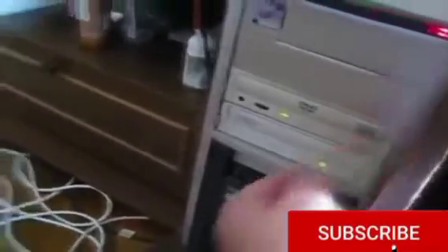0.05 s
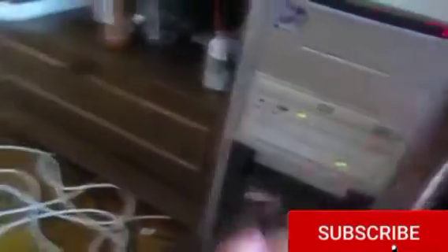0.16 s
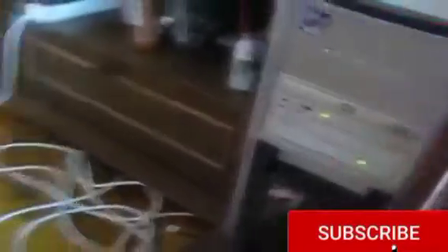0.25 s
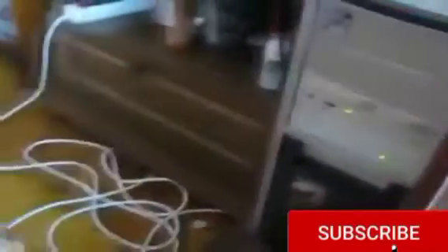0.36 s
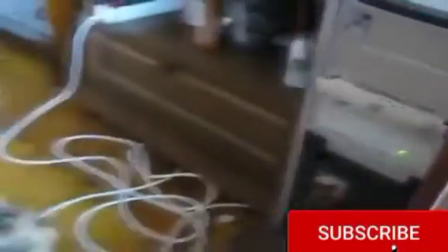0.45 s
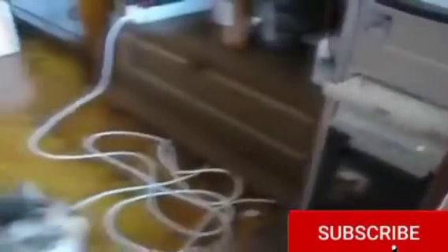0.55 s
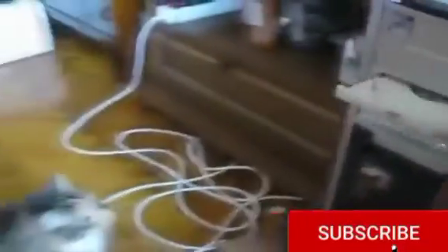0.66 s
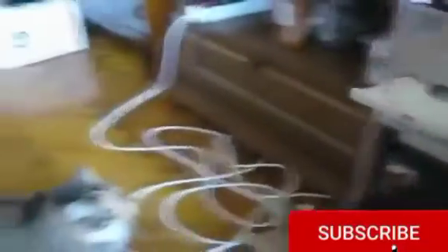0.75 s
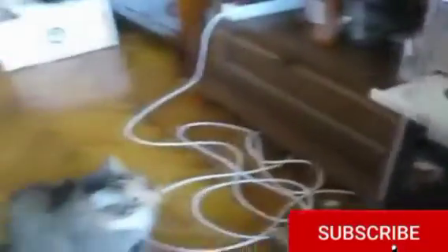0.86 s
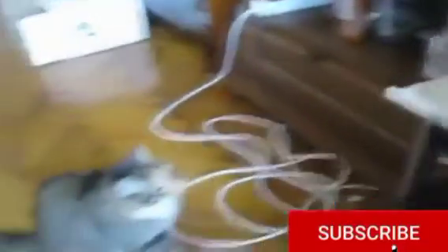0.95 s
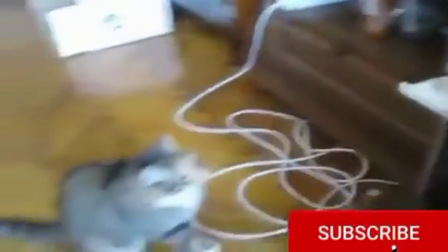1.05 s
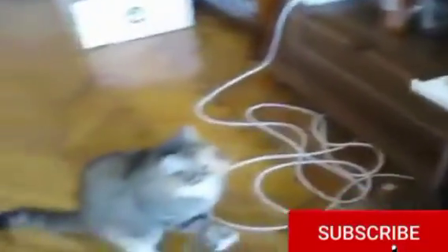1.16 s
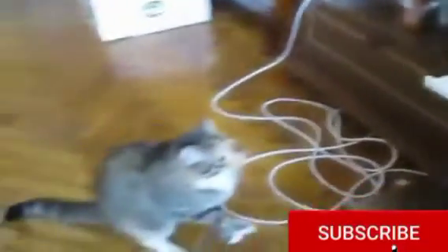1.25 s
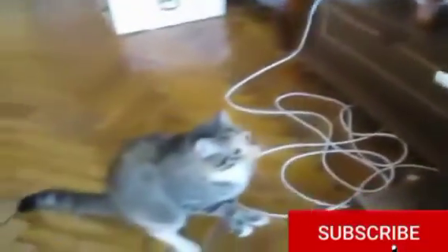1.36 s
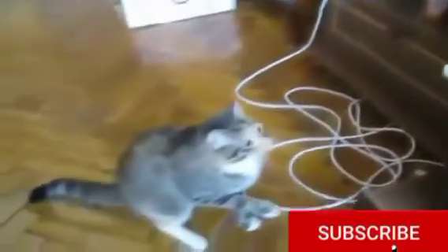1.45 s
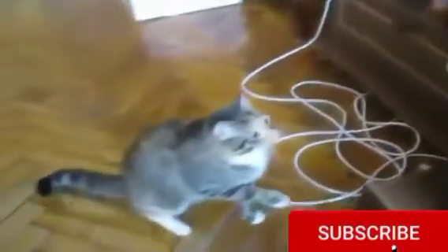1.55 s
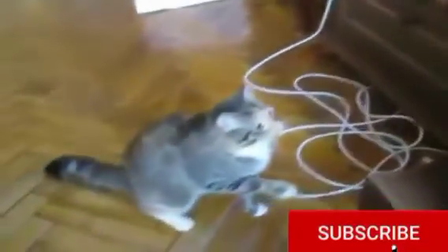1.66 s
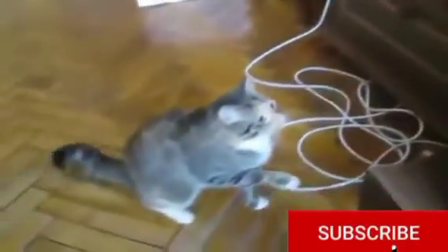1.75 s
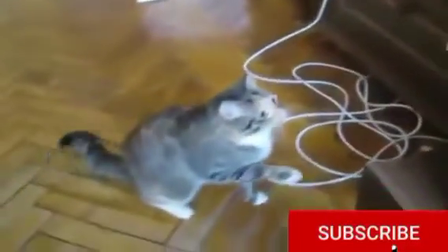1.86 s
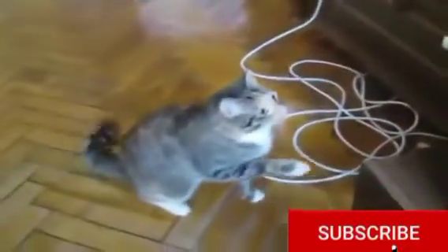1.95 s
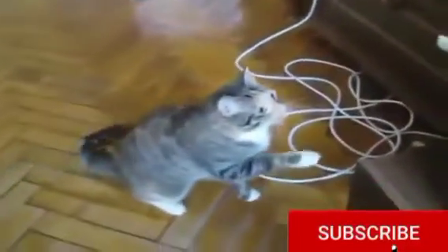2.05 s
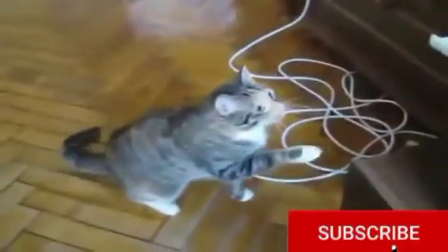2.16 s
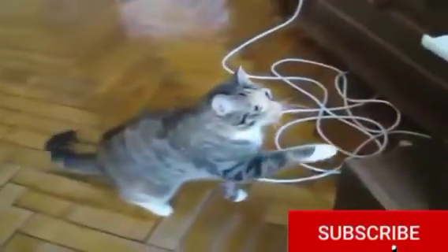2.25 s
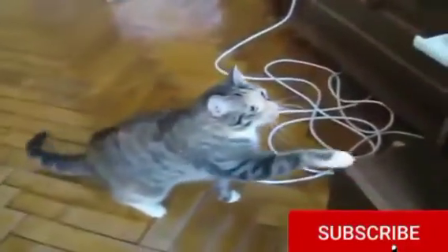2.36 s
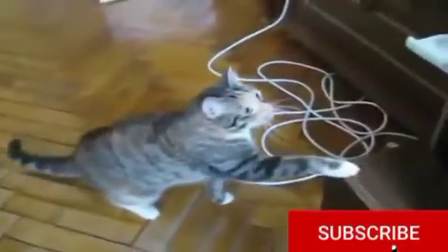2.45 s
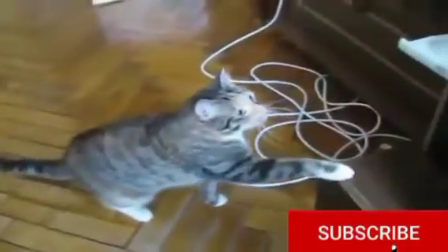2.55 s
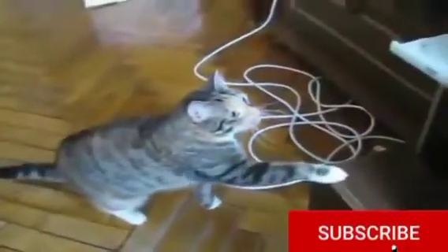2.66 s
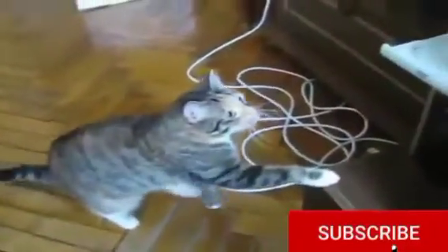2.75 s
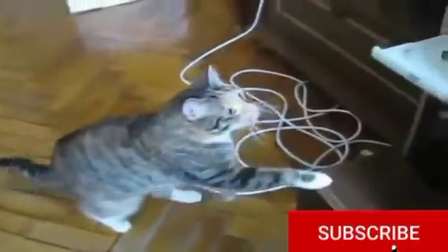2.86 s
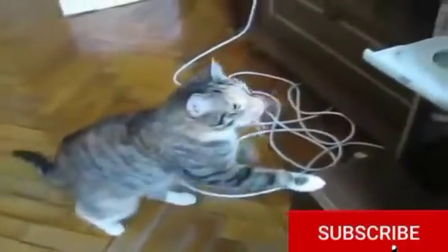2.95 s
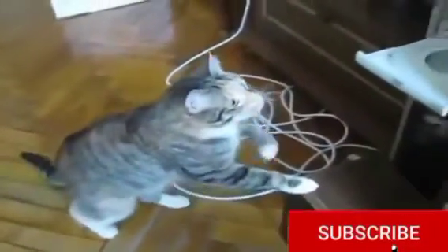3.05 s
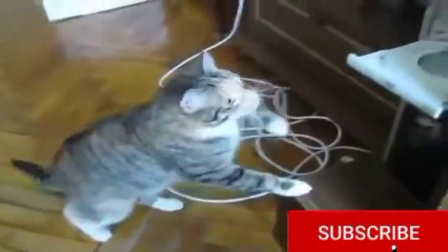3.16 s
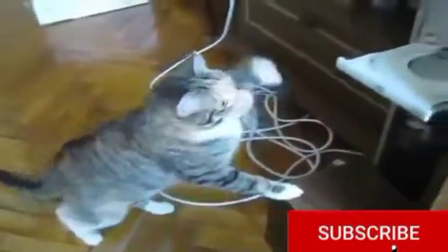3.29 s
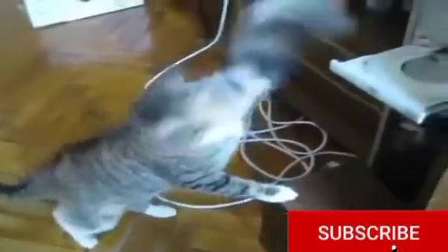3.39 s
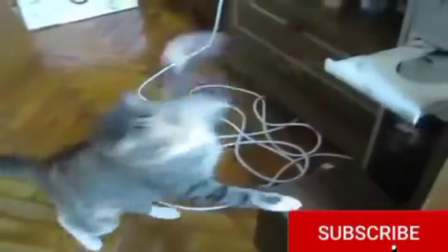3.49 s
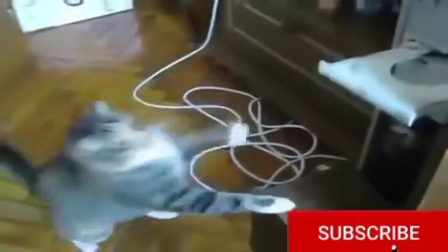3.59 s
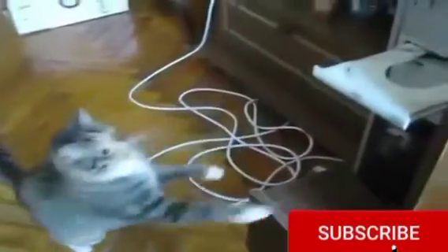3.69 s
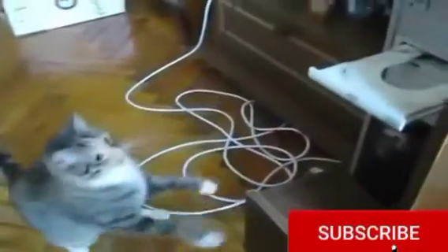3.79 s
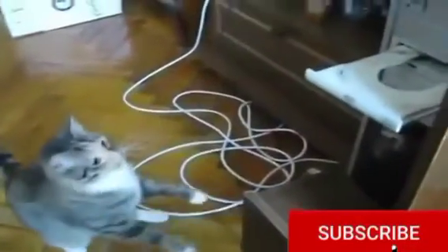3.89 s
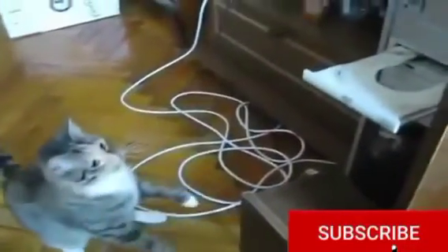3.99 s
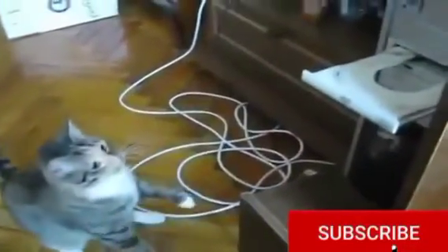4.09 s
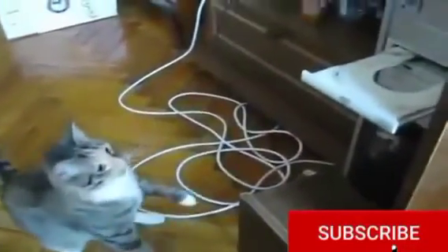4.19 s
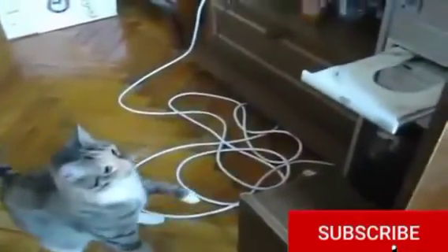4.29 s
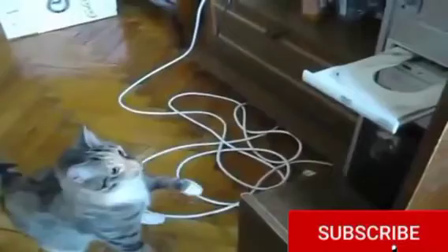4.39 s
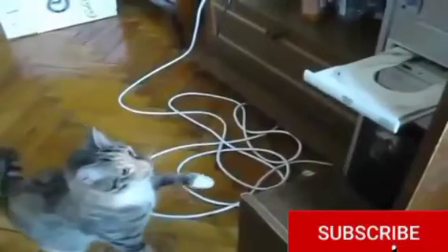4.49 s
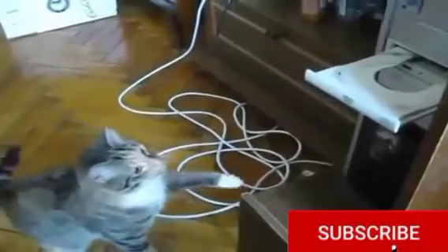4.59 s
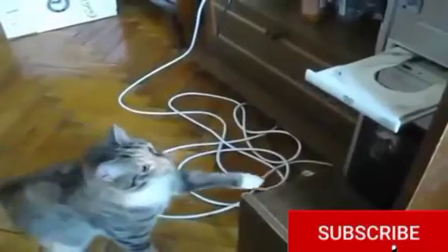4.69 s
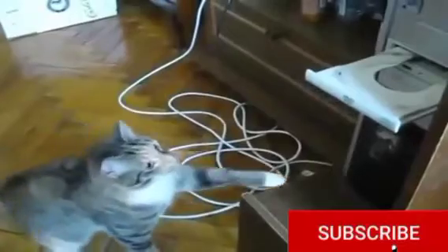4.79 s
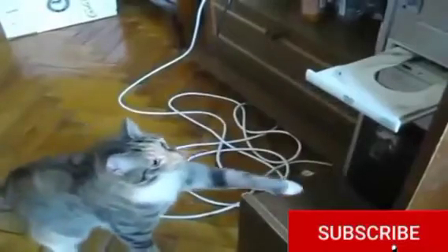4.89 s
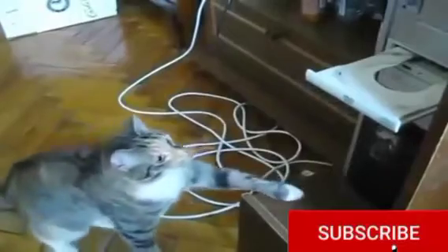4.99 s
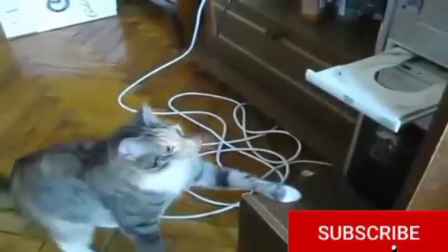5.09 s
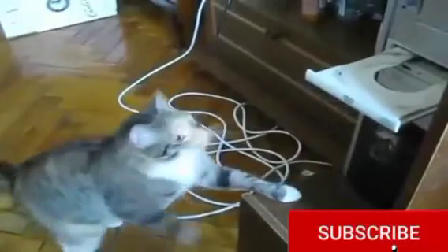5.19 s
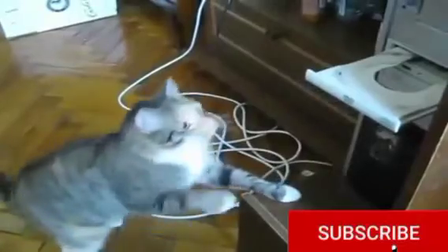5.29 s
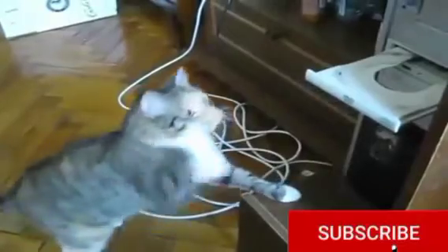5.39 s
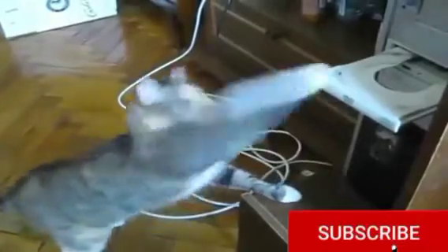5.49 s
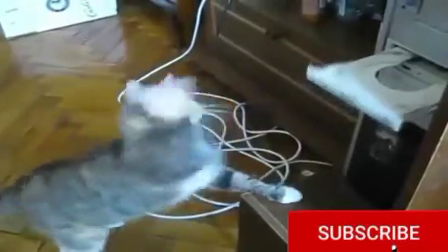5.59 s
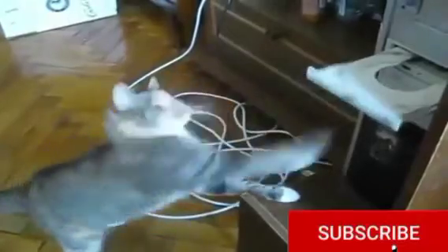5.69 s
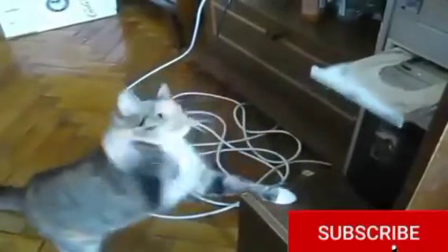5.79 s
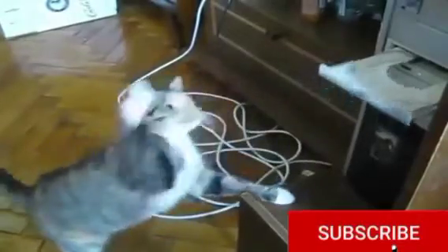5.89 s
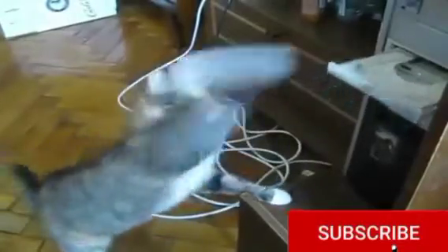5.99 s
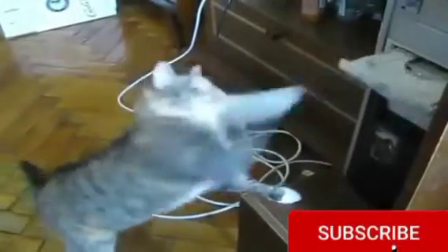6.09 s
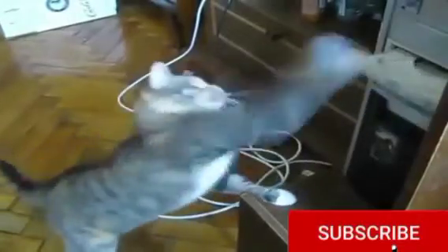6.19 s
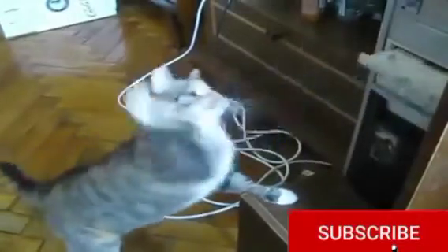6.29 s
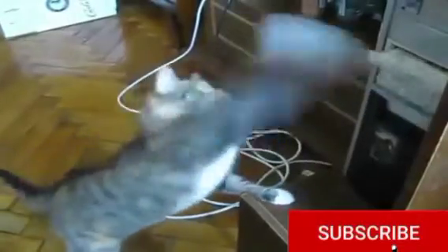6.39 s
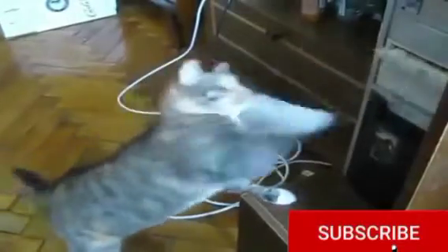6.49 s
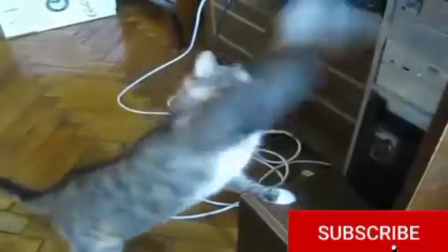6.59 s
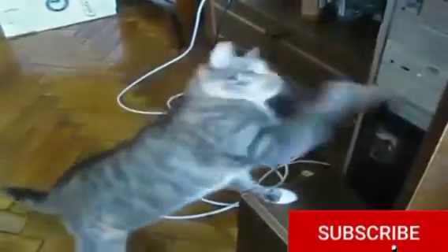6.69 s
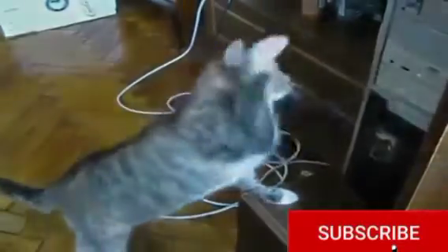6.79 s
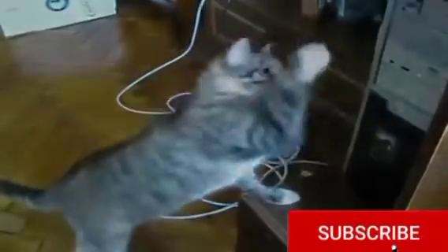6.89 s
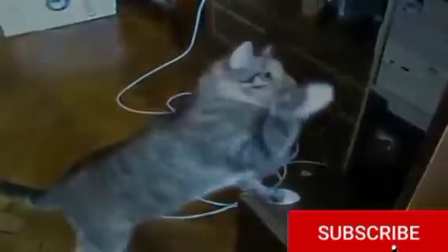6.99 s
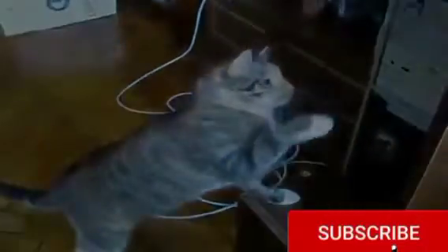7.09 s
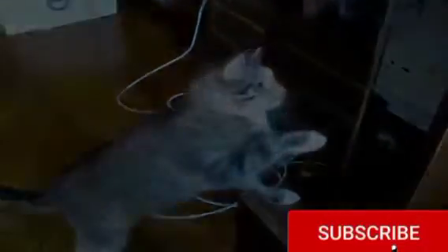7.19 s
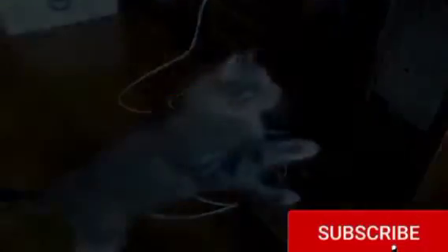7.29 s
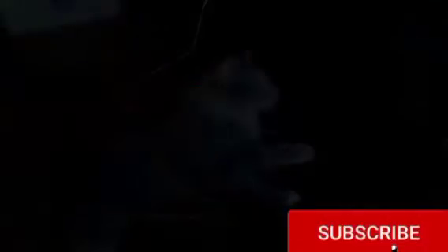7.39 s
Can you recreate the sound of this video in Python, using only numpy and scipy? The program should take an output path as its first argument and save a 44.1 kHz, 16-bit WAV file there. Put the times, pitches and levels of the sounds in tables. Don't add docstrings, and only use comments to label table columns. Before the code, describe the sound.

A desktop computer's fans hum steadily in a small room. Close by, a disc tray unlatches with light clacks and whirs out on a small motor, its whine dropping in pitch. After a quiet gap, a cat swats the plastic tray with one sharp, bouncing crack, then, after another pause, a flurry of louder whacks and rattles as the motor drags it back to a solid end clunk. Small handheld recorder, slightly muffled treble, loud hits overloading.

```python
import sys
import numpy as np
from scipy import signal
from scipy.fft import rfft, irfft, next_fast_len
from scipy.io import wavfile
from scipy.ndimage import uniform_filter1d, map_coordinates

SR = 44100
rng = np.random.default_rng(int(sys.argv[2]) if len(sys.argv) > 2 else 0)


def gain_from_decibels(decibels):
    exponent = np.asarray(decibels, float) / 20
    return 10 ** exponent


def master_out(mix):
    frames = np.transpose(np.atleast_2d(mix))
    ceiling = np.clip(frames, -1, 1)
    pcm = np.round(ceiling * 32767).astype(np.int16)
    wavfile.write(sys.argv[1], SR, pcm)


N = 328545
TIME = np.arange(N) / SR


def unit(x):
    return x / np.sqrt(np.mean(x ** 2) + 1e-20)


def along(points, hz):
    f, v = np.transpose(points)
    return np.interp(np.log(hz + 1), np.log(f + 1), v)


def curves(rows, silent_db=None):
    s, *columns = np.transpose(rows)
    return [np.interp(TIME, s, c, silent_db, silent_db) for c in columns]


def wobble(rate):
    knots = rng.standard_normal(int(N * rate / SR) + 4)
    return map_coordinates(knots, [TIME * rate])


def filtered(x, response):
    m = next_fast_len(len(x) + 8192)
    return irfft(rfft(x, m) * response(np.fft.rfftfreq(m, 1 / SR)), m)[:len(x)]


def bell(f, hz, width_hz):
    return 1j * f * width_hz / (hz * hz - f * f + 1j * f * width_hz)


def humps(f, peaks, lift):
    coarse = f[::16]
    power = sum(np.abs(lift * gain_from_decibels(db) * bell(coarse, hz, w)) ** 2 for hz, w, db in peaks)
    return np.interp(f, coarse, np.sqrt(1 + power))


def flecked(x, depth_db):
    hz, _, z = signal.stft(x, SR, nperseg=1024)
    flecks = unit(uniform_filter1d(rng.standard_normal(z.shape), size=2, axis=1))
    depth = np.clip(hz / 4000, .15, 1)[:, None]
    return signal.istft(z * gain_from_decibels(depth_db * flecks * depth), SR, nperseg=1024)[1][:N]


def whine(rows, blur, lift_db):
    hz, db = curves(rows)[0], curves(rows, -150)[1]
    turn = 2 * np.pi * np.cumsum(hz) / SR + blur * wobble(160)
    return gain_from_decibels(db + lift_db + 1.5 * wobble(90)) * np.sin(turn)


# (time [s], level [dB])
FAN_LEVEL = [
    (0, -43),
    (1.5, -45),
    (4.3, -45),
    (7.45, -44.5),
]
# (frequency [Hz], level [dB per Hz])
FAN_AIR = [(12, -44), (20, -5), (74, -3), (112, -2.5), (746, -4), (811, -0.5), (1230, -9), (1410, -7.5),
           (2400, -7.5), (6540, -18.5), (8170, -22), (11400, -22.5), (15500, -30)]
# (frequency [Hz], width [Hz], level over the air [dB])
CASE_RESONANCES = [(950, 15, -8), (1250, 113, 7.5), (1720, 120, 3.5), (2308, 39, 7.5), (4640, 100, -3.5)]
# (frequency [Hz], level [dB])
BLADE_TONES = [(861.3, -61), (958.2, -56.5), (1260, -62), (2347, -80)]


def fans():
    noise = flecked(rng.standard_normal(N), depth_db=4.5)
    air = filtered(noise, lambda f: gain_from_decibels(along(FAN_AIR, f)) * humps(f, CASE_RESONANCES, lift=1.55))
    tones = np.zeros(N)
    for hz, db in BLADE_TONES:
        level = gain_from_decibels(db + 0.5 + 1.2 * wobble(8.8))
        tones += level * np.sin(2 * np.pi * hz * TIME + 1.5 * wobble(4.9))
    return gain_from_decibels(curves(FAN_LEVEL)[0] - 1.0 + 0.46 * wobble(5.84)) * unit(air) + tones


# (time [s], frequency [Hz], level [dB])
COIL_WHISTLE = [
    (1.98, 15000, -75),
    (2.04, 14700, -68),
    (2.1, 13500, -67),
    (2.16, 13800, -67),
    (2.2, 13500, -75),
]


def coil():
    return whine(COIL_WHISTLE, blur=.5, lift_db=2)


# (time [s], peak level [dB])
CABLE_POP = [
    (5.504, -3.5),
]


def pop():
    start_s, peak_db = CABLE_POP[0]
    t = TIME - start_s
    after = np.maximum(t, 0)
    rise = np.exp(np.minimum(t, 0) / .00005)
    swing = 1.18 * np.exp(-after / 0.00022) - 0.18 * np.exp(-after / 0.0016)
    push = np.where(t < 0, rise, swing)
    return gain_from_decibels(peak_db + 2.0) * filtered(push, lambda f: 1 / (1 + 1j * f / 4500))


# (frequency [Hz], time to fall 60 dB [s])
ROOM_DECAY = [(200, 0.32), (2000, 0.79), (8000, 0.42)]


def room(x):
    hz, t, z = signal.stft(rng.standard_normal(SR // 2), SR, nperseg=256)
    fall = gain_from_decibels(-60 * t / along(ROOM_DECAY, hz)[:, None])
    tail = signal.istft(z * fall, SR, nperseg=256)[1]
    late = np.pad(x, (250, 0))
    return signal.fftconvolve(late, tail / np.linalg.norm(tail))[:N]


# (time [s], frequency [Hz], level [dB])
GEAR_WHINE = [
    (0.65, 5660, -57),
    (0.72, 5620, -46),
    (0.745, 5420, -38),
    (0.775, 4400, -48),
    (0.832, 3480, -49),
    (0.912, 3140, -48),
    (1.16, 3060, -52),
    (1.292, 2905, -51.5),
    (1.36, 2660, -53),
]
# (time [s], frequency [Hz], level [dB])
WHINE_PARTIALS = [
    (1.0, 3670, -64),
    (1.08, 3830, -55),
    (1.17, 3820, -53),
    (1.2, 5400, -70),
    (1.27, 5680, -50),
    (1.33, 5940, -58),
]


def gears():
    return whine(GEAR_WHINE, blur=1.25, lift_db=3.5) + whine(WHINE_PARTIALS, blur=1.25, lift_db=5)


# (start [s], stop [s], rub level [dB], boom over rub [dB], fizz over rub [dB])
MOTOR_RUNS = [
    (-.1, .5, -50.5, -17, -5.5),
    (.55, 1.34, -40.5, -12.5, -11.5),
    (1.36, 1.535, -51.5, -3, -12),
    (6.078, 6.862, -34.5, -3.5, -23),
]


def motor(t):
    spin_up_s, spin_down_s = .03, 0.077
    start, stop, db, boom_db, fizz_db = np.transpose(MOTOR_RUNS)[:, :, None]
    speed = np.clip(np.minimum((t - start) / spin_up_s, 1 + (stop - t) / spin_down_s), 0, 1)
    return gain_from_decibels([db, db + boom_db, db + fizz_db, db]) * speed


# (time [s], swell time [s], peak level [dB], held back at first [dB], boom over rub [dB])
TRAY_SHUDDERS = [(.48, 0.026, -41.5, 6, -2), (.53, 0.032, -31, 10, -3.5), (0.611, 0.0087, -30, 12, -3),
                 (.665, 0.011, -32.5, 3, -11), (.74, 0.019, -33, -1, -12), (.8, 0.054, -42, 1, 1),
                 (3.675, 0.12, -23.5, 12.5, -6.5), (3.9, 0.089, -44.5, -2, 1),
                 (5.757, 0.035, -19, 12, -11.5), (5.81, 0.035, -22.5, 22, -8.5),
                 (5.885, 0.1, -21.5, 20, -10.5), (6.0, 0.065, -26, -4, -11),
                 (6.272, 0.089, -19.5, 6.5, -9.5), (6.448, .125, -22, 7.5, -10),
                 (6.664, 0.13, -24.5, 2, -13.5), (6.868, 0.069, -24, -2, -3.5)]


def shudders(t):
    fade, boom_gains, fizz_loses, top_loses = 134.5, 19, 87, 27
    s, swell, db, held_db, boom_db = np.transpose(TRAY_SHUDDERS)[:, :, None]
    age = np.maximum(t - s, 0)
    rub = db - held_db * np.maximum(1 - age / swell, 0) - fade * np.maximum(age - swell, 0)
    boom = rub + boom_db + boom_gains * age
    fizz = rub - 11.5 + 0.57 * (db + 22.5) - fizz_loses * age
    top = rub + 2 - top_loses * age
    return gain_from_decibels([rub, boom, fizz, top]) * np.clip((t - s) / 0.0054, 0, 1)


def chatter(per_s, spiky_db):
    when, size = rng.random((2, N))
    sizes = gain_from_decibels(-spiky_db * np.log(size + 0.027))
    ticks = (when < per_s / SR) * sizes * rng.standard_normal(N)
    return flecked(unit(ticks) + 1.38 * rng.standard_normal(N), depth_db=4.5)


# (frequency [Hz], level [dB per Hz])
RUB_COLOUR = [(590, -39), (1000, -32), (1140, -4), (2130, -0.5), (2510, -1.5), (3790, -0.5), (7150, -9),
              (8130, -15), (9000, -18), (11700, -45), (19800, -120)]
BOOM_COLOUR = [(35, -47), (60, -21.5), (129, -13), (269, -3.5), (409, -9.5), (534, -1), (697, -3.5),
               (1250, -6.5), (1620, -9), (2750, -120)]
FIZZ_COLOUR = [(6000, -58), (8000, -6), (10000, 3), (15000, -5)]
# (frequency [Hz], width [Hz], level [dB])
TRAY_RESONANCES = [(620, 76, -4.5), (1110, 39, 1.5), (1790, 91, 1), (2530, 180, -5), (3060, 450, -5.5),
                   (3540, 33, -1), (4260, 130, -16), (4500, 90, -9), (5370, 71, -26), (6990, 44, -24)]


def slide():
    t = TIME[::32]
    power = (shudders(t) ** 2).sum(1) + (motor(t) ** 2).sum(1)
    rub_gain, boom_gain, fizz_gain, top_gain = [np.interp(TIME, t, g) for g in np.sqrt(power)]

    def coloured(x, colour):
        return unit(filtered(x, lambda f: gain_from_decibels(along(colour, f)) * humps(f, TRAY_RESONANCES, lift=1.53)))

    grit = chatter(per_s=2500, spiky_db=4)
    rub, fizz = coloured(grit, RUB_COLOUR), coloured(grit, FIZZ_COLOUR)
    boom = coloured(grit[::-1], BOOM_COLOUR)
    top = filtered(rub, lambda f: 1 / (1 + (3500 / (f + 1)) ** 4))
    scrape = rub_gain * (rub - top) + top_gain * top + fizz_gain * fizz
    return gain_from_decibels(-2.0) * (gain_from_decibels(1.04 * wobble(60)) * scrape + gain_from_decibels(1.07 * wobble(30)) * boom_gain * boom)


# (time [s], frequency [Hz], level [dB], time to fall 60 dB [s])
PANEL_RINGS = [(.545, 255.4, -34, 0.15), (.565, 255, -32, .2), (0.626, 515, -28, .07),
               (.624, 3530, -23, .03), (3.673, 5100, -14, .03), (3.673, 5880, -17, 0.038),
               (.555, 4920, -22, 0.033), (.745, 3020, -29, 0.043), (.762, 2440, -27, .04),
               (.764, 3030, -26, 0.034), (3.672, 4800, -5, .02), (3.73, 251, -35, 0.29), (3.8, 70, -39, .4),
               (3.821, 4100, -17, .03), (5.756, 4030, -8.5, .04), (5.757, 4700, -9.5, .04),
               (5.77, 154, -44, .25), (5.87, 62, -49, .25), (5.88, 4040, -5, 0.027),
               (6.838, 710, -14.5, 0.038), (6.839, 1154, -22, 0.11), (6.867, 1110, -4.5, 0.02),
               (6.867, 1963, -9, 0.045), (6.868, 2270, -9, 0.03), (3.672, 1347, -7, 0.014),
               (3.673, 3120, -9.5, 0.015), (.054, 1840, -33, 0.033)]


def latch():
    out, t = np.zeros(N + SR), np.arange(SR // 3) / SR
    for s, hz, db, t60 in PANEL_RINGS:
        envelope = gain_from_decibels(db - 60 * t / t60) * (1 - np.exp(-t * hz / 0.46))
        out[round(s * SR):][:len(t)] += envelope * np.sin(2 * np.pi * hz * t)
    return out[:N]


# (frequency [Hz], time to fall 60 dB [s])
TRAY_MODES = [(680, 0.0046), (1130, 0.012), (1880, 0.011), (2250, 0.017), (2900, 0.015), (3250, 0.0073),
              (3750, 0.027), (4100, 0.027), (4650, 0.0084), (5300, 0.026), (5900, 0.023), (6800, 0.028)]


def contacts(events, t60, rise_s, ring, snap_share_db):
    s, db, hz, thud_db, snap_db = np.transpose(events)[:, :, None]
    size = 2048
    t, f = np.arange(size) / SR, np.fft.rfftfreq(size, 1 / SR)
    noise = np.moveaxis(rng.standard_normal((len(s), 3, size)), 1, 0)
    crack, push, spit = noise * (1 - np.exp(-(t / rise_s) ** 2))
    struck = gain_from_decibels(3 * rng.standard_normal((len(s), len(TRAY_MODES))))
    modes = struck @ [bell(f, c, np.log(1000) / np.pi / np.clip(d, .008, .025)) for c, d in TRAY_MODES]
    fall = gain_from_decibels(-60 * t / np.clip(t60, .006, .05))

    def shaped(x, gain):
        y = irfft(rfft(x) * gain)
        return y / np.abs(y).max(1, keepdims=True)

    centre = bell(f, hz, 0.58 * hz) + 0.043 * bell(f, 2400, 2300)
    body = shaped(crack * fall, centre * (1 + ring * modes))
    thud = shaped(push * gain_from_decibels(-60 * t / 0.035), bell(f, 456, 1020) ** 2)
    snap = shaped(spit * fall, bell(f, 9940, 2500) ** 2)
    each = gain_from_decibels(db) * (body + gain_from_decibels(thud_db + 1.0) * thud + gain_from_decibels(snap_db + snap_share_db) * snap)
    where = np.round(s * SR).astype(int) + np.arange(size)
    return np.bincount(where.ravel(), each.ravel(), N + size)[:N]


# (time [s], peak level [dB], centre [Hz])
UNLATCH_TICKS = [(0.488, -33, 4360), (0.502, -29, 1250), (0.574, -21, 3140), (0.621, -13, 2600),
                 (0.639, -18, 2240), (0.671, -16, 1720), (0.742, -23, 3060), (0.763, -25, 2990),
                 (0.816, -31, 2580), (1.175, -30, 3850), (1.348, -28, 3950)]
# (time [s], peak level [dB], centre
# [Hz])
TRAY_KNOCKS = [(3.724, -15.5, 4820), (3.768, -5, 4500), (3.819, -6.5, 4280), (3.872, -10.5, 3370),
               (3.94, -22, 3050), (3.985, -31, 2700), (4.029, -31, 3440), (4.067, -29.5, 3300),
               (4.119, -30, 1780), (5.807, -7, 4740), (5.862, -2.5, 3680), (5.947, -11, 4640),
               (5.986, -6, 4030), (6.027, -4.5, 5440), (6.133, -19, 3680), (6.155, -15, 3340),
               (6.176, -20.5, 3630), (6.2, -18, 2440), (6.218, -16, 3630), (6.231, -12, 3000),
               (6.294, -15, 3730), (6.461, -5, 3000), (6.689, -15, 2570)]


def rattles():
    loose = []
    for s, db, hz in UNLATCH_TICKS + TRAY_KNOCKS:
        thud_db = -27 if s < 2 else -23.5
        loose.append((s, db, hz, thud_db, -24 + .3 * db))
    return gain_from_decibels(-3.0) * contacts(loose, t60=0.033, rise_s=0.0023, ring=0.99, snap_share_db=-9)


# (time [s], peak level [dB], centre [Hz], thud level [dB], snap level [dB])
HARD_BLOWS = [(0.052, -39, 1770, -14, -18), (0.534, -18, 1300, -18, -10), (.545, -18, 1140, -9, 6),
              (0.554, -21.5, 4900, -14, 24.5), (0.612, -13, 1640, -21, -20), (3.672, 1.5, 4440, -24, -39),
              (3.678, -23, 4590, -26, -30.5), (5.755, -3, 3740, -46, -29), (5.762, -7, 3940, -29, -33),
              (5.783, -5, 4190, -25, -24), (5.879, 2, 4450, -41, -14), (6.076, -8, 3700, -21, -28),
              (6.271, 1.5, 4170, -21.5, -20), (6.445, 2.5, 4200, -24, 3), (6.661, 2.5, 3500, -28.5, -19),
              (6.838, -19, 738, 0, -26), (6.866, -2, 1880, -28, -36)]


def clacks():
    return gain_from_decibels(1.2) * contacts(HARD_BLOWS, t60=0.024, rise_s=.0004, ring=0.78, snap_share_db=-18.5)


def scene():
    hits = clacks() + rattles()
    rails = slide() + gears() + latch()
    echo = room(gain_from_decibels(-12) * hits + gain_from_decibels(-12) * rails)
    return (fans() + coil() + echo + rails + hits)[None]


# (frequency [Hz], shoulder width [Hz], core width [Hz])
NOTCH_BAND = (8115, 1470, 190)


def notched(f):
    hz, shoulder_hz, core_hz = NOTCH_BAND
    return (1 - .88 * bell(f, hz, shoulder_hz)) * (1 - .9 * bell(f, hz, core_hz))


def band_limit(f):
    treble = np.where(f < 15050, 1, gain_from_decibels(-32 - .012 * (f - 15050)))
    return treble * 1j * f / (15 + 1j * f)


def roll_off(x):
    return signal.sosfilt(signal.butter(12, 16340, fs=SR, output="sos"), x)


def record(dry):
    x = dry[0] / (1 + np.abs(dry[0] / .93) ** 4) ** (1 / 4)
    x = x + 0.068 * x * x
    x = filtered(x, lambda f: notched(f) * band_limit(f)) + filtered(pop(), band_limit)
    return roll_off(x[None])


dry = scene()
out = record(dry)
master_out(out)
```